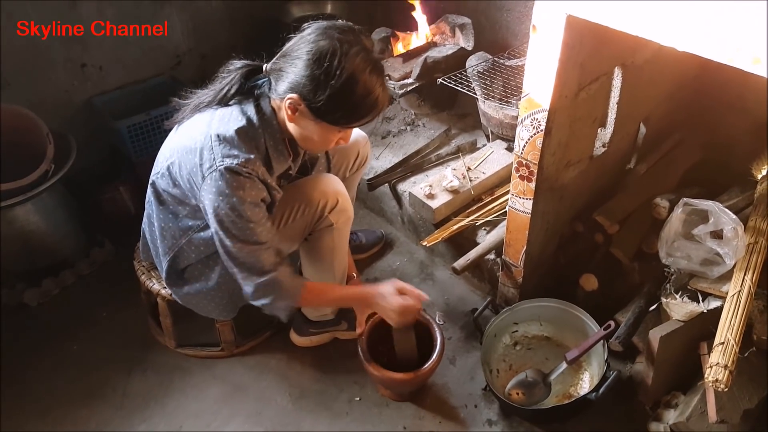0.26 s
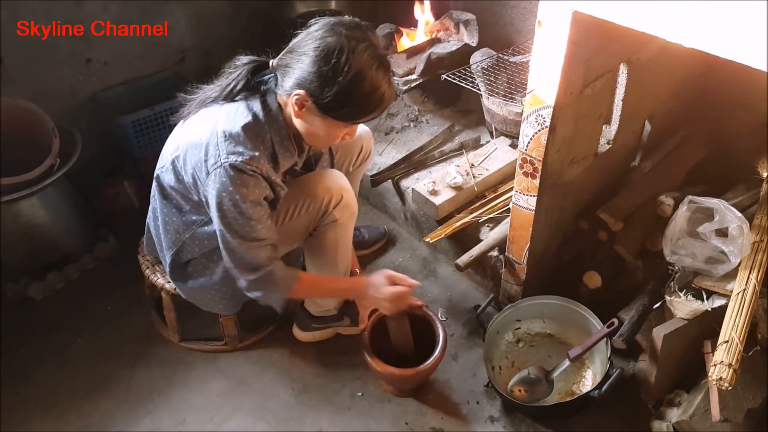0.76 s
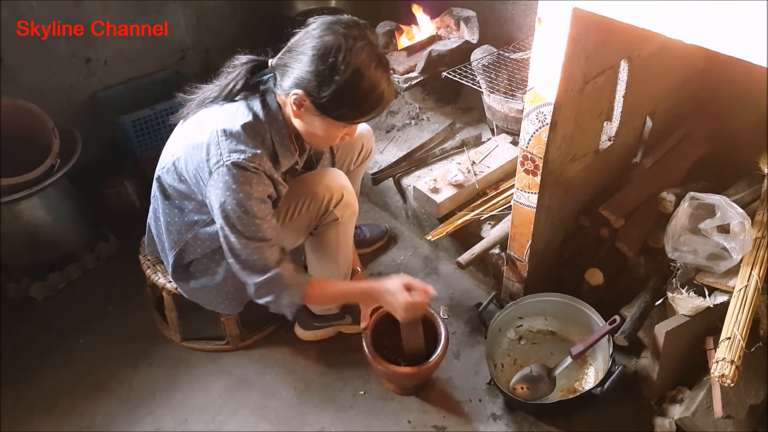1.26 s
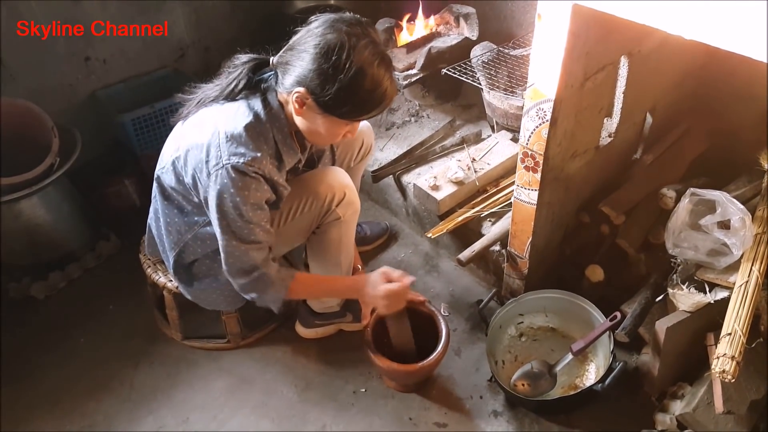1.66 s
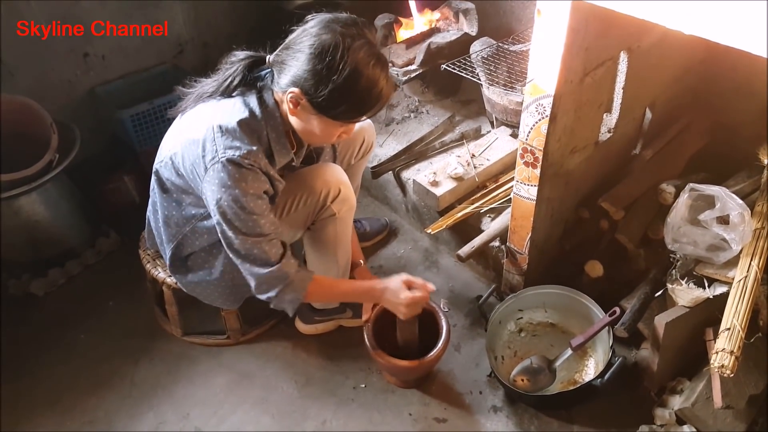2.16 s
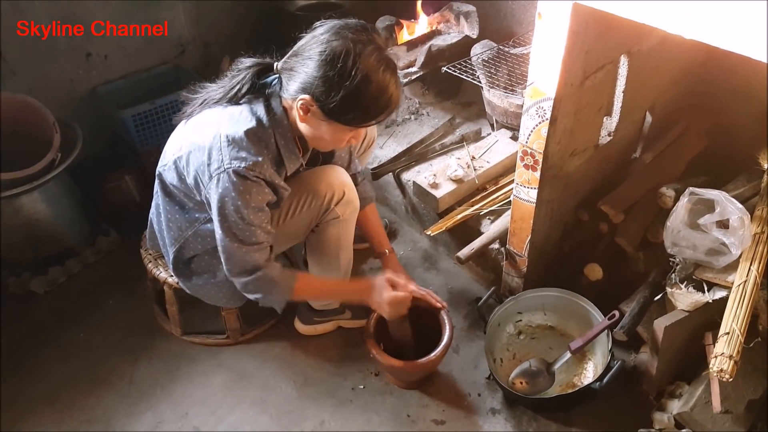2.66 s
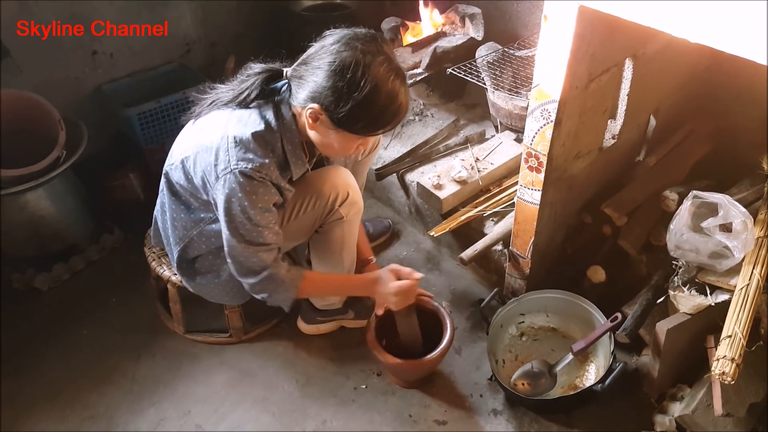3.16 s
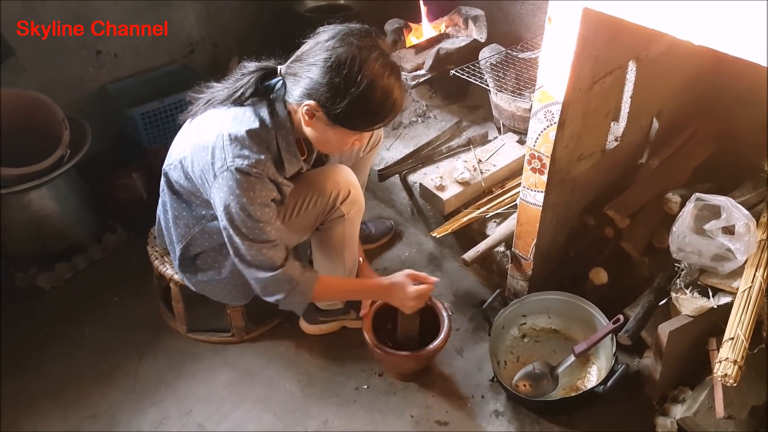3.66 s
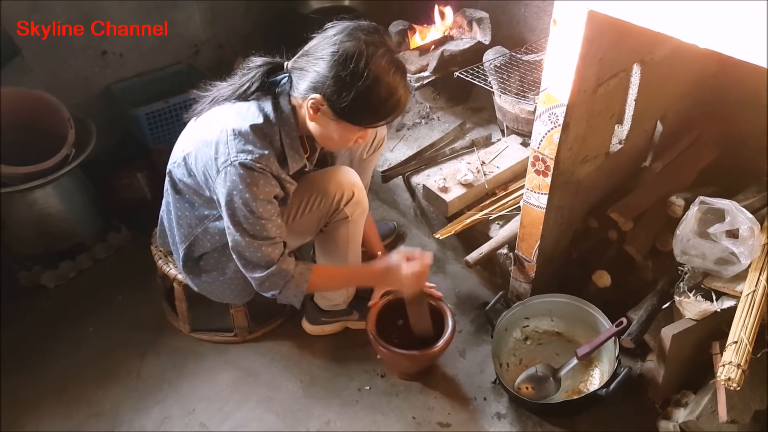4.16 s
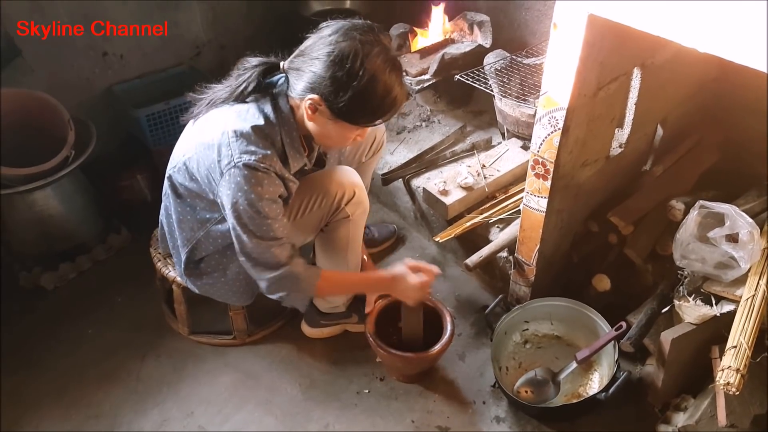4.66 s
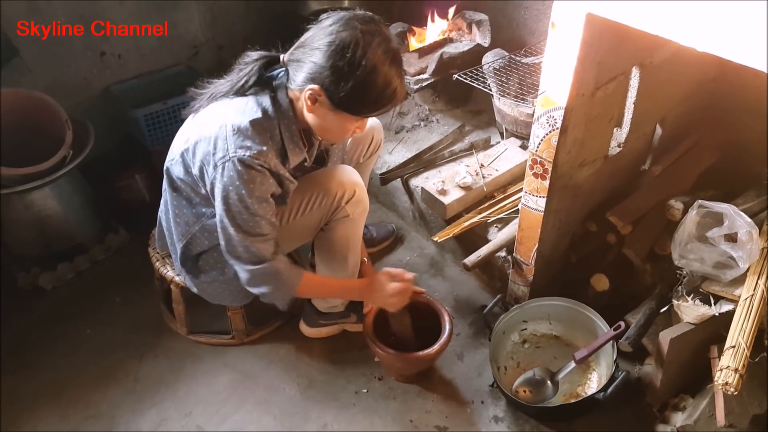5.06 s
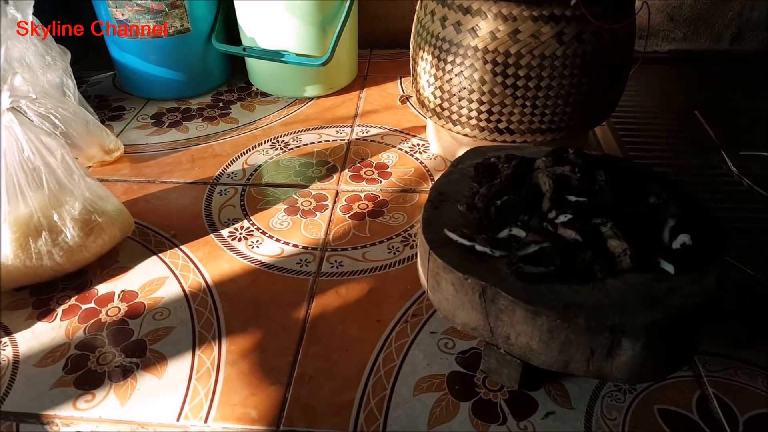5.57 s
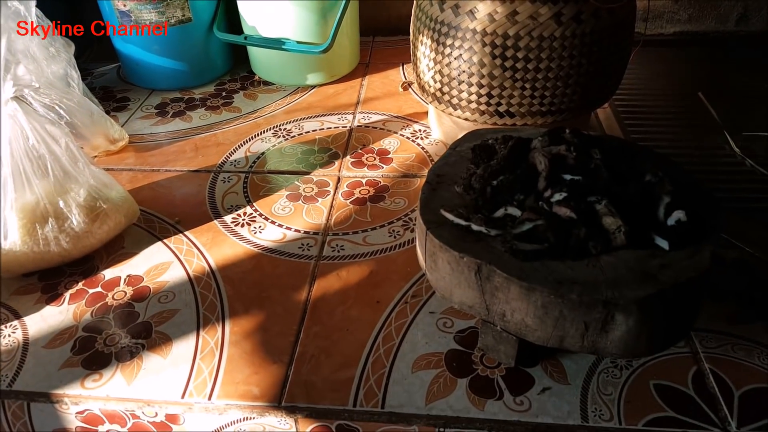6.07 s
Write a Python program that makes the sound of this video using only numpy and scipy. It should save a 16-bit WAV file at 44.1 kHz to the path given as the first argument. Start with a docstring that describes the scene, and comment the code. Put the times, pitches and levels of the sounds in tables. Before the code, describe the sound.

A wooden pestle pounds a clay mortar on a kitchen floor, about three to four blows a second, each a thump with a knock, a brief ring and a crunch of paste. Between blows come fine rustling, faint ticks, dull distant thuds and two soft shuffles. The sound then switches to a quieter tiled room, where a loud hollow knock falls between two soft thuds. Nearby stereo microphones pick up short room reverberation.

```python
"""A wooden pestle pounds a clay mortar on the floor of a hard-walled kitchen: the floor thumps, the bowl
knocks and rings, the paste crunches. Between blows come a fine rustle, dull step-like thuds from further
off and faint ticks; something shuffles twice. A cut leads to a quieter tiled room where a knock is dying
away; a loud hollow knock follows between two more thuds. Both rooms are heard on a microphone pair."""
import sys
import numpy as np
from scipy import signal
from scipy.fft import rfft, irfft
from scipy.io import wavfile

SR = 44100
rng = np.random.default_rng(int(sys.argv[2]) if len(sys.argv) > 2 else 0)


def digitize_waveform(pressure):
    """Quantize a signal to 16-bit integers and store it at the path in sys.argv[1].

    Rows of a 2-D input are taken as channels; values are limited to [-1, 1].
    """
    field = np.atleast_2d(pressure).T
    bounded = np.clip(field, -1, 1)
    quanta = np.round(bounded * 32767).astype(np.int16)
    wavfile.write(sys.argv[1], SR, quanta)


N = 277830
TIME = np.arange(N) / SR


def amp(db):
    """Decibels to gain."""
    return 10 ** (np.asarray(db) / 20)


def rms_one(x):
    """Scale to rms 1."""
    return x / np.sqrt(np.mean(x ** 2) + 1e-20)


def at_hz(points, hz):
    """Read a (f/Hz, value) table on a log-frequency axis."""
    freqs, values = np.transpose(points)
    return np.interp(np.log(hz), np.log(freqs), values)


def band(x, low_hz, high_hz):
    """Band-pass."""
    edges = np.clip([low_hz, high_hz], 10, .45 * SR)
    return signal.sosfilt(signal.butter(2, edges, "band", fs=SR, output="sos"), x + 1e-18)


def low_cut(x, hz=102):
    """Steep cut below about 100 Hz: little deep bass comes through from the blows, thuds and knocks."""
    return signal.sosfilt(signal.butter(4, hz, "high", fs=SR, output="sos"), x + 1e-18)


def clicks(times, gains):
    """A click of each gain at each time."""
    out = np.zeros(N)
    out[np.clip(np.round(np.asarray(times) * SR).astype(int), 0, N - 1)] = gains
    return out


def chatter(times, gains, gap_s):
    """Hard contact: six touches of random sign in quick succession, swelling and dying."""
    draws, out = rng.random((len(times), 2, 6)), 0
    for k, share in enumerate([0.09, 0.94, 1.0, 1.0, 0.25, 0.083]):
        jitter, sign = draws[:, 0, k], np.sign(draws[:, 1, k] - .5)
        out = out + clicks(times + gap_s * (k + jitter), gains * share * sign)
    return out


def bursts(times, gains, decay_s, rise_s=.0001):
    """Contact noise: a puff that swells in rise_s and dies in decay_s at each time."""
    fade, swell = np.exp(-1 / (decay_s * SR)), np.exp(-1 / (rise_s * SR))
    poles = np.convolve([1, -fade], [1, -swell])
    envelope = signal.lfilter([1 - swell], poles, clicks(times, gains) + 1e-18)
    return envelope * rng.standard_normal(N)


def grain(mean_db):
    """Spiky random gain that turns smooth noise gritty."""
    return amp(mean_db * rng.exponential(1, N))


def struck(times, db, modes, scatter_db):
    """Every blow rings every mode, its strength scattered at random by scatter_db."""
    out, scatter = 0, rng.standard_normal((len(times), len(modes)))
    for k, (hz, mode_db, t60) in enumerate(modes):
        r, w = amp(-60 / (t60 * SR)), 2 * np.pi * hz / SR
        force = clicks(times, amp(db + mode_db + scatter_db * scatter[:, k]))
        out = out + signal.lfilter([0, np.sin(w)], [1, -2 * r * np.cos(w), r * r], force + 1e-18)
    return out


# diffuse sound across the microphone pair: (f/Hz, left-right correlation)
PAIR_LIKENESS = [(60, 0.85), (250, 1), (600, 0.41), (1200, 0.017), (4000, 0.067), (12000, 0.033)]
BAND_EDGES_HZ = 22 * 2 ** np.arange(0, 9.8, .5)


def stereo_bands(size):
    """Half-octave bands of noise at the two microphones, alike in the bass, unlike in the treble."""
    white = rng.standard_normal((2, 2, size))
    for k, (low, high) in enumerate(zip(BAND_EDGES_HZ, BAND_EDGES_HZ[1:])):
        mid, side = band(white[k % 2], low, high)
        hz = np.sqrt(low * high)
        alike = at_hz(PAIR_LIKENESS, hz)
        yield hz, np.sqrt(1 + alike) * mid + np.sqrt(1 - alike) * side * [[1], [-1]]


def diffuse_noise(spectrum):
    """Steady coloured noise from all round the microphones, at rms 1."""
    return rms_one(sum(amp(at_hz(spectrum, hz)) * noise for hz, noise in stereo_bands(N)))


# blows on the kitchen floor, nearby; relative levels: (t/s, thump/dB, knock/dB, crack/dB, clink/dB)
PESTLE_BLOWS = [(0.003, -29.5, -25, -24.5, -33), (0.236, -34, -35, -37.5, -35.5),
                (0.476, -32.5, -31.5, -36.5, -57), (0.73, -25.5, -15, -17.5, -19.5),
                (0.954, -37.5, -41.5, -43.5, -65), (1.213, -31.5, -30.5, -32.5, -38),
                (1.569, -27.5, -27, -31.5, -40.5), (1.84, -28, -31, -39.5, -55),
                (2.165, -23, -16, -12.5, -17.5), (2.4369, -26.5, -12.5, -16.5, -24),
                (2.794, -30, -23, -19.5, -20), (3.089, -31.5, -15.5, -13.5, -15),
                (3.356, -25, -50, -31, -24.5), (3.699, -29, -33, -41.5, -43),
                (3.975, -27.5, -26.5, -25, -26.5), (4.327, -29.5, -21, -24.5, -21),
                (4.647, -21.5, -16, -16.5, -28), (4.905, -30.5, -33, -30, -25),
                (5.178, -21.5, -12.5, -16, -17)]
# modes of the clay bowl: (f/Hz, relative level/dB, t60/s)
MORTAR_MODES = [(627.5, 2.5, 0.029), (782, 11.5, 0.012), (1332, -1, 0.033), (1923, -11, 0.04),
                (2333, 0, 0.034), (3020, -2.5, 0.018), (3175, -4, 0.032), (3899, -3, 0.033),
                (4430, -19.5, 0.019)]


def pestle():
    """Wood hits clay: returns the sound at the microphones and the smoother one that fills the room."""
    s, thump_db, knock_db, crack_db, clink_db = np.transpose(PESTLE_BLOWS)
    thump = band(band(clicks(s, amp(thump_db + 42)), 72, 330), 52, 800)
    grit_gain = amp(-40.5) + amp(crack_db - 2)   # every blow crunches the paste, a hard crack more so
    grit = band(band(bursts(s, grit_gain, decay_s=0.0063, rise_s=0.0013), 3200, 7700), 2000, 19000)
    ring_s = s + 0.000987   # the clay rings once the contact has built up
    ring = struck(ring_s, knock_db - 9, MORTAR_MODES[:3], scatter_db=6.5)
    ring += struck(ring_s, crack_db - 3, MORTAR_MODES[3:7], scatter_db=3.5)
    ring += struck(ring_s, clink_db + 6, MORTAR_MODES[7:], scatter_db=0)
    knock_gain, crack_gain = amp(knock_db + 24), amp(crack_db + 25)

    def contact(knock, crack):
        """Dull and sharp parts of the contact."""
        return band(band(knock, 450, 1300), 420, 2100) + band(band(crack, 1287, 3740), 610, 6500)
    near = contact(chatter(s, knock_gain, gap_s=0.000623), chatter(s, crack_gain, gap_s=.0005))
    spread = contact(clicks(s, knock_gain), clicks(s, crack_gain))   # chatter evens out over directions
    return thump + grit + ring + near, thump + grit + amp(-5.5) * ring + amp(1.5) * spread


def hollow_echo(x, delay_s=.019, band_hz=(540, 710)):
    """A hollow nearby throws the bowl's knock back as one dull, narrow echo."""
    late = np.concatenate([np.zeros(round(delay_s * SR)), x])[:N]
    return amp(7.5) * band(band(late, *band_hz), *band_hz)


# reverberation in either room: (f/Hz, t60/s)
ROOM_DECAY = [(80, 0.79), (210, 0.4), (560, 0.48), (1470, 0.45), (3880, 0.43), (10200, 0.45)]
# its colour at the microphones: (f/Hz, relative level/dB)
ROOM_SPECTRUM = [(80, 2.5), (250, 1.1), (700, 3), (2000, 3), (5000, -3.5), (14000, -6.5)]


def room(x, rise_s=0.0009, early_s=0.04):
    """Dense reflections off hard walls build up in a few ms and die band by band."""
    t = np.arange(int(.75 * SR)) / SR
    early = amp(-3) * np.exp(-(t / early_s) ** 2)   # first reflections briefly lift the tail
    tail = sum(noise * amp(at_hz(ROOM_SPECTRUM, hz)) * (early + amp(-60 * t / at_hz(ROOM_DECAY, hz)))
               for hz, noise in stereo_bands(len(t)))
    tail *= 1 - np.exp(-t / rise_s)
    tail = amp(1) * tail / np.sqrt(np.sum(tail ** 2) / 2)
    return signal.fftconvolve(x[None], tail, axes=1)[:, :N]


# kitchen room tone, all round the microphones: (f/Hz, relative density/dB)
KITCHEN_TONE = [(12, -37), (20, -5.5), (55, -9), (142, 4.5), (216, -5), (388, -8), (698, -24), (849, -22.5),
                (1090, -21.5), (2320, -24.5), (6720, -29), (8410, -40.5), (16000, -42)]


def kitchen_air():
    """The kitchen's steady background: a low rumble under a soft hiss."""
    return amp(-49.5) * diffuse_noise(KITCHEN_TONE)


# drags of the pestle, wide across the pair: (top t/s, level/dB, width/s)
PASTE_DRAGS = [(.08, -54, 0.034), (.225, -61, 0.031), (.67, -57.5, .04), (.98, -45.5, 0.021),
               (1.3, -59, 0.043), (1.95, -60, 0.037), (2.38, -55.5, 0.06), (2.58, -52.5, 0.027),
               (2.895, -54, 0.038), (3.79, -54, 0.047), (4.085, -52, 0.052), (4.26, -56, .02),
               (4.75, -49.5, 0.03)]
# their bright hiss: (f/Hz, relative density/dB)
PASTE_SPECTRUM = [(1500, -41), (3000, -0.5), (5000, -3.5), (8500, -6), (12500, -15), (16000, -8)]


def paste_rustle():
    """Fine grainy hiss swells and sinks as the pestle drags through the paste."""
    swells = sum(amp(db) * np.exp(-((TIME - s) / width_s) ** 2) for s, db, width_s in PASTE_DRAGS)
    return swells * rms_one(grain(0.63) * diffuse_noise(PASTE_SPECTRUM))


# thuds far from the microphones, both rooms; relative levels: (t/s, body/dB, boom/dB, slap/dB)
FAR_THUDS = [(0.158, -28.5, -28, -46), (0.632, -28, -33, -53), (1.128, -48, -37, -70),
             (1.62, -25, -34.5, -59), (2.092, -36.5, -51, -43), (2.113, -13.5, -27.5, -23.5),
             (2.631, -27.5, -23.5, -65), (3.732, -31, -32.5, -53), (3.782, -26, -46, -50),
             (4.216, -26, -30.5, -39), (4.696, -33, -30, -40), (5.508, -41, -36.5, -67),
             (6.012, -31, -40, -47.5)]


def thuds(after_s, before_s):
    """Soft heavy contacts, dulled by distance: a dull body, a round boom, a faint slap."""
    s, body_db, boom_db, slap_db = np.transpose([r for r in FAR_THUDS if after_s <= r[0] < before_s])

    def push(db):
        """A clean shove followed by uneven touches."""
        return clicks(s, amp(db + 28)) + chatter(s, amp(db + 29), gap_s=.004)
    body = band(band(push(body_db), 180, 717), 210, 798)
    boom = band(clicks(s, amp(boom_db + 49)), 117, 240)
    slap = band(band(band(push(slap_db - 8), 790, 2400), 820, 2300), 700, 2300)
    return low_cut(body + boom + slap)


# faint ticks, centred between the microphones, the last in the tiled room: (t/s, relative level/dB)
FAINT_TICKS = [(0.1794, -40), (0.3103, -43), (0.4219, -43.5), (0.5496, -41.5), (0.6624, -44), (0.9025, -43),
               (1.042, -42), (1.149, -40), (1.2894, -45), (1.427, -44), (1.6407, -38.5), (1.7814, -40.5),
               (1.923, -42.5), (2.0757, -43.5), (2.6673, -38.5), (3.313, -43), (3.5907, -38),
               (3.921, -41.5), (4.4475, -40.5), (5.0414, -47.5), (5.1192, -40), (6.022, -35)]


def ticks():
    """Small bright crunches: a crisp snap and a gritty swish."""
    s, db = np.transpose(FAINT_TICKS)
    swish = grain(2.5) * bursts(s, amp(db - 19.5), decay_s=.03)
    snap = bursts(s, amp(db - 6.5), decay_s=.003, rise_s=.001)
    return band(snap + swish, 2300, 16000)


# strokes over the kitchen floor, the first two run together: (t/s, length/s, first/dB, last/dB)
SHUFFLE_STROKES = [(3.259, 0.054, -48.5, -46), (3.347, 0.18, -43, -50.5), (4.14, 0.15, -55.5, -51)]


def shuffle_envelope(attack_s=0.0045, release_db_per_s=277):
    """Each stroke sets in quickly, slides from its first level to its last and fades."""
    level = 0
    for s, length_s, first_db, last_db in SHUFFLE_STROKES:
        db = np.interp(TIME, [s, s + length_s], [first_db, last_db])
        db -= release_db_per_s * np.maximum(TIME - s - length_s, 0)
        level = level + amp(db) * np.clip((TIME - s) / attack_s, 0, 1)
    return level


# rubbing on the floor, centred between the microphones: (f/Hz, relative density/dB)
RUB_SPECTRUM = [(88, -21.5), (150, 1), (362, 9), (427, -2), (841, -0.5), (991, -7), (1280, -1),
                (12000, -38), (15600, -53), (22000, -120)]


def shuffle_rub():
    """Something rubs over the floor: grainy noise under each stroke."""
    grains = rng.standard_normal(N) * grain(2.5)
    rub = sum(amp(at_hz(RUB_SPECTRUM, np.sqrt(low * high))) * band(grains, low, high)
              for low, high in zip(BAND_EDGES_HZ[5:], BAND_EDGES_HZ[6:]))
    return low_cut(shuffle_envelope() * rms_one(rub))


# hiss of the same strokes, wide across the pair: (f/Hz, relative density/dB)
HISS_SPECTRUM = [(1470, -37), (2500, -1), (2810, 4.5), (4950, -5.5), (9510, -16.5), (12500, -32),
                 (16000, -12)]


def shuffle_hiss():
    """The fine, bright edge of the rubbing."""
    return amp(-2) * shuffle_envelope() * rms_one(grain(0.63) * diffuse_noise(HISS_SPECTRUM))


# tiled-room knocks, the first heard only as a tail: (t/s, relative level/dB, ring offset/dB)
HOLLOW_KNOCKS = [(5.2, -28.5, -21.5), (5.604, -16, -2.5)]
# modes of the hollow wooden body: (f/Hz, relative level/dB, t60/s)
WOOD_MODES = [(232, -37, 0.19), (333, -8.5, 0.055), (675, -8.5, 0.11), (838, -4, 0.045), (1423, 0.5, 0.03),
              (2020, 1, 0.084), (2076, -2.5, 0.042), (2150, -10.5, 0.087), (3120, -8, 0.035),
              (3430, -18.5, 0.018), (3950, -6.5, 0.064), (4540, -12, 0.062)]


def knocks():
    """Hollow wood is struck: a rough crack and a short ring."""
    s, db, ring_db = np.transpose(HOLLOW_KNOCKS)
    crack = band(band(bursts(s, amp(db + 5.5), decay_s=0.0037), 350, 5700), 300, 10500)
    return low_cut(crack + struck(s, db + ring_db, WOOD_MODES, scatter_db=1))


# room tone among the tiles, all round the microphones: (f/Hz, relative density/dB)
TILED_TONE = [(12, -48), (20, -14), (53, -11.5), (81, -6.5), (183, -2), (303, -14.5), (369, -6),
              (502, -26.5), (1070, -28.5), (2770, -31), (3280, -30.5), (6610, -41), (16200, -54.5)]


def tiled_air(whine_hz=14481):
    """The tiled room's quieter background, with a faint high whine."""
    tone = amp(-51.5) * diffuse_noise(TILED_TONE)
    whine = band(rng.standard_normal((2, N)), whine_hz - 60, whine_hz + 60)
    return tone + amp(-84) * rms_one(whine)


def scene(cut_s=5.315, fade_s=0.0067):
    """Kitchen until the cut, tiled room after it."""
    blows, spread = map(low_cut, pestle())
    crunches = ticks()
    small = crunches + shuffle_rub()
    far = thuds(0, cut_s)
    mortar = np.array([np.roll(blows, round(.000025 * SR)), blows])   # nearer the right microphone
    kitchen = mortar + small + amp(-1.5) * far
    kitchen += hollow_echo(spread) + room(spread + amp(3.5) * small + far)
    kitchen += kitchen_air() + shuffle_hiss() + paste_rustle()

    wood = knocks()
    far_and_ticks = thuds(cut_s, N / SR) + crunches
    tiled = np.array([wood, np.roll(wood, round(.00025 * SR))])   # nearer the left microphone
    tiled += amp(5) * room(wood)
    tiled += amp(-2) * far_and_ticks + room(far_and_ticks) + tiled_air()
    cut = np.clip((TIME - cut_s) / fade_s, 0, 1)
    return (1 - cut) * kitchen + cut * tiled


# colour difference of the microphone pair: (f/Hz, left minus right/dB)
PAIR_BALANCE = [(60, -7), (110, 3), (200, 2), (380, 2), (700, 1.5), (1290, 3), (2380, 2), (4400, 0),
                (8120, -3), (15000, 0)]


def record(dry, cutoff_hz=16900):
    """The two microphones differ in colour; peaks are rounded, the top is cut."""
    hz = np.fft.rfftfreq(N, 1 / SR)
    tilt_db = at_hz(PAIR_BALANCE, np.maximum(hz, 1)) / 2
    coloured = irfft(rfft(dry) * amp([tilt_db, -tilt_db]), N)
    return signal.sosfilt(signal.cheby2(12, 70, cutoff_hz, fs=SR, output="sos"), np.tanh(coloured))


dry = scene()
out = record(dry)
digitize_waveform(out)
```